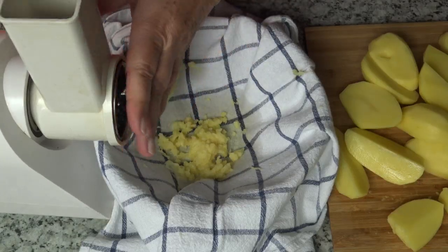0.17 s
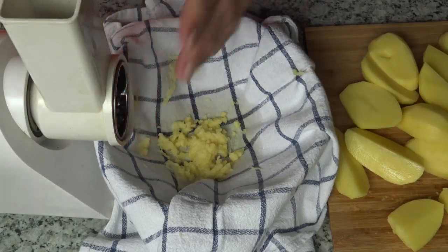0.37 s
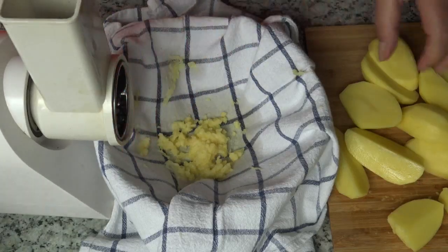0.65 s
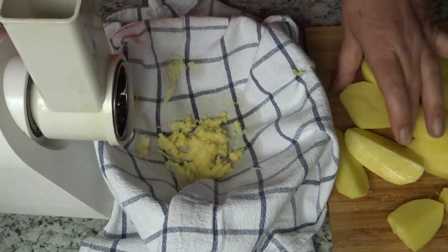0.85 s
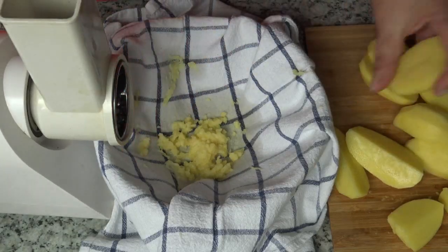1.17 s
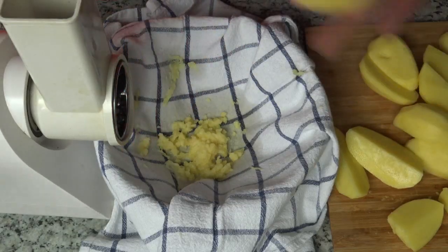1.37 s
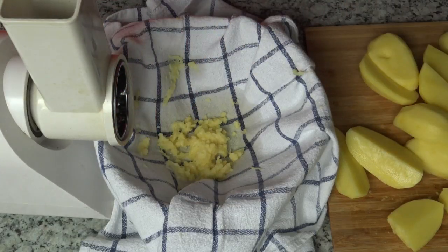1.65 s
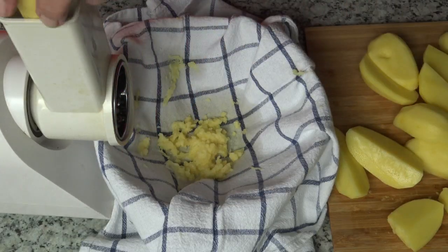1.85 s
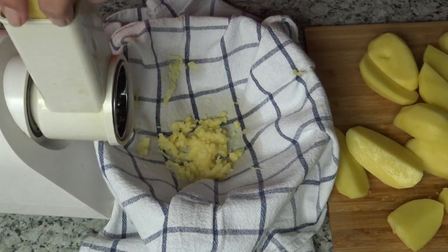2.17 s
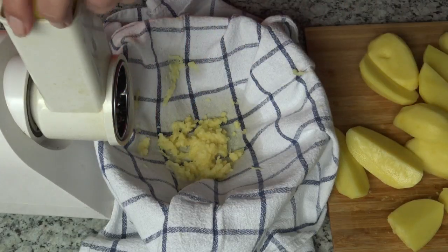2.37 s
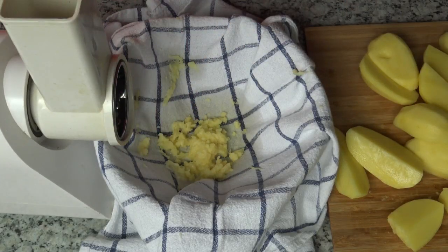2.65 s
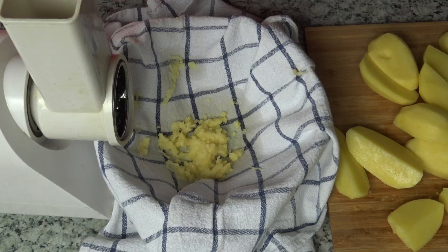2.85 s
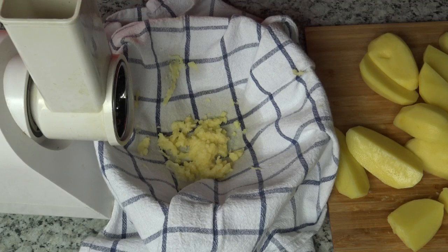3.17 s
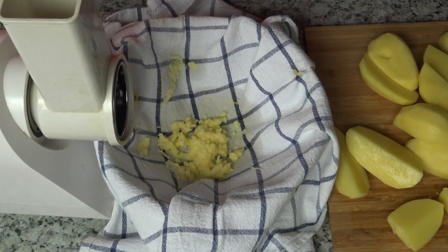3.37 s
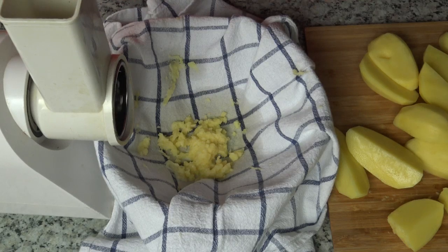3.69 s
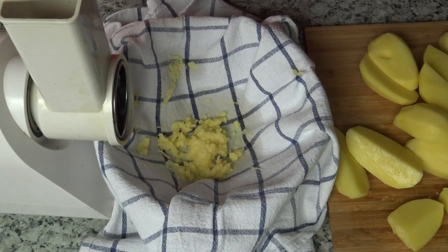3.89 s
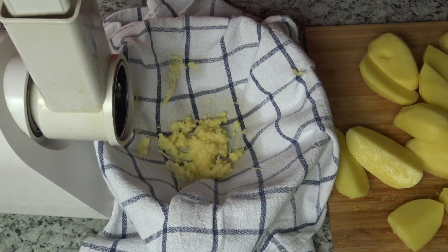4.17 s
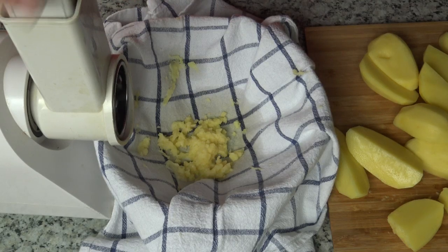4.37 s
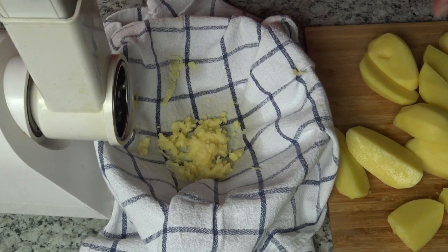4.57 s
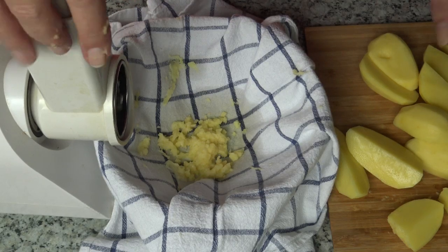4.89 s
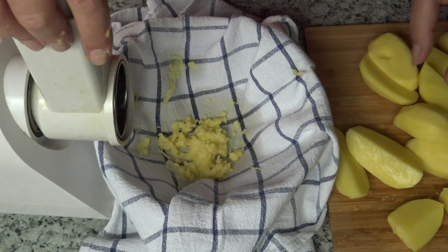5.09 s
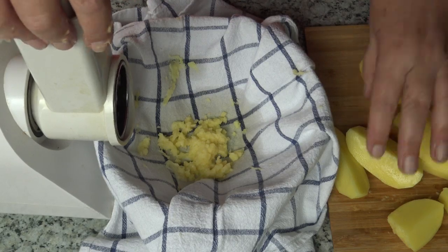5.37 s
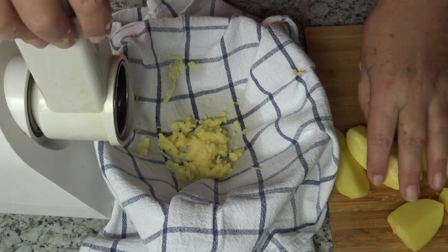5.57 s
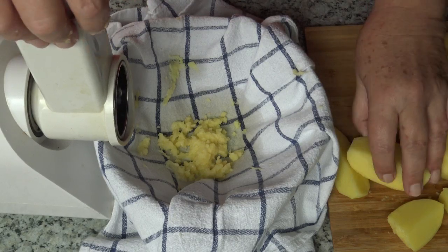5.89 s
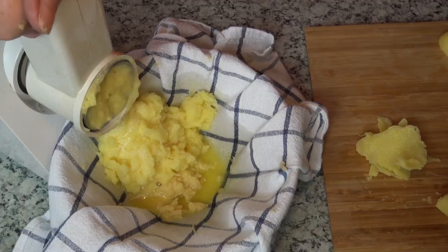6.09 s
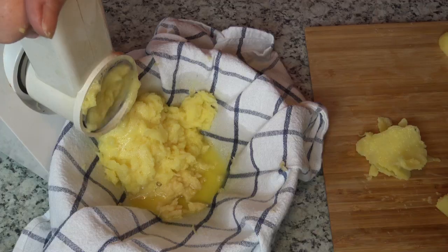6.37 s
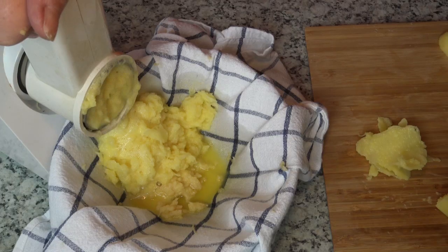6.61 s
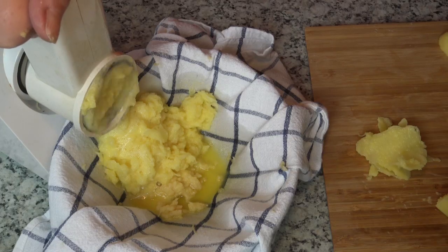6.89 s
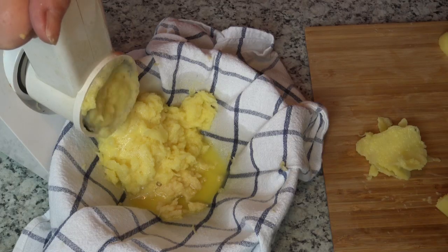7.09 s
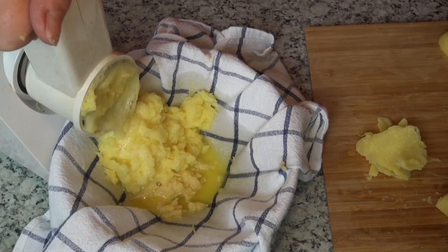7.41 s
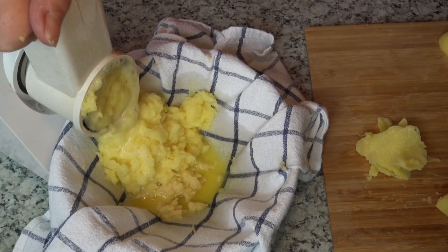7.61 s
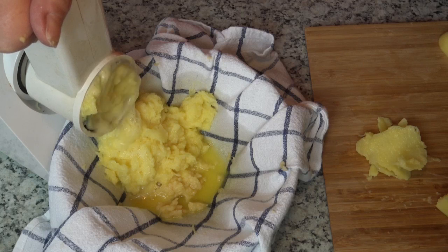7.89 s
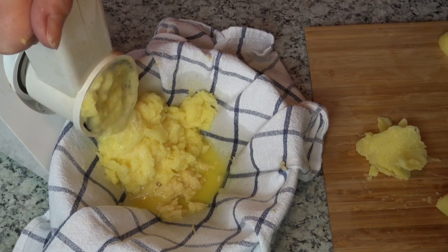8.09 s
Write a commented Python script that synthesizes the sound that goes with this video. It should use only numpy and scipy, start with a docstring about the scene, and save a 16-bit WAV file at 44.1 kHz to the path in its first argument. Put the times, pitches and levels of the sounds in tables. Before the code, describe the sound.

Potato pieces thump and squeak into a plastic-chuted grater; its motor clicks on, races up to a rattling whine, then shreds under load.

```python
"""On a kitchen counter, an electric drum grater stands close to the microphone.
The plastic pusher is drawn out and put down; potato rubs and squeaks down the chute and lands on the steel drum.
The switch snaps, and the geared motor runs up with hum, whining shaft orders, gear rattle and brush hiss.
After a short fade it is heard grating a full load, with the drum ringing in a narrow noise band.
Contacts are decaying modes with a thud and a click; a quiet room and a short reverberation lie behind."""
import sys
import numpy as np
from scipy import signal
from scipy.fft import rfft, irfft, next_fast_len
from scipy.io import wavfile
from scipy.ndimage import map_coordinates

SR = 44100
rng = np.random.default_rng(int(sys.argv[2]) if len(sys.argv) > 2 else 0)


def store_wav(level_fs):
    """Save 16-bit WAV to argv[1]."""
    pcm = np.round(np.clip(np.atleast_2d(level_fs), -1, 1) * 32767)
    wavfile.write(sys.argv[1], SR, pcm.T.astype(np.int16))


N = 363825


def amp(db):
    """Decibels to linear gain."""
    return 10 ** (np.asarray(db) / 20)


def unit(x):
    """x scaled to rms 1."""
    return x / np.sqrt(np.mean(x ** 2) + 1e-20)


def along(points, hz):
    """Interpolate (Hz, value) points on a log frequency axis."""
    f, v = np.transpose(points)
    return np.interp(np.log(hz + 1), np.log(f + 1), v)


def curves(rows):
    """One value per sample for each column after the time."""
    s, *cols = np.transpose(rows)
    return [np.interp(np.arange(N) / SR, s, c) for c in cols]


def wobble(rate):
    """A smooth random curve with rate knots a second."""
    knots = rng.standard_normal(int(N * rate / SR) + 4)
    coarse = np.arange(0, N, 32)
    smooth = map_coordinates(knots, [coarse * rate / SR])
    return np.interp(np.arange(N), coarse, smooth)


def filtered(x, response):
    """x filtered by a response given as a function of frequency."""
    size = x.shape[-1]
    m = next_fast_len(size + 8192)
    gain = response(np.fft.rfftfreq(m, 1 / SR))
    return irfft(rfft(x, m) * gain, m)[..., :size]


def coloured(x, spectrum):
    """x shaped by a spectrum, at rms 1."""
    return unit(filtered(x, lambda hz: amp(along(spectrum, hz))))


def noise(spectrum, size=N):
    """Random noise shaped by a spectrum, at rms 1."""
    return coloured(rng.standard_normal(size), spectrum)


def quiet_room():
    """The steady, mostly low noise of the room."""
    # room noise spectrum: pitch_hz [Hz], relative level_db [dB per Hz]
    room_spectrum = [(15, -40), (25, -1), (110, 4.5), (268, -10), (585, -11), (652, -15), (976, -12.5),
                     (1120, -14), (1240, -17), (2130, -17), (3280, -23), (10500, -27), (14100, -33),
                     (15700, -51)]
    return amp(-51.5) * noise(room_spectrum)


def kitchen(x):
    """Tiles and cupboards answer with a diffuse tail; each band dies at its own rate."""
    # reverberation time: pitch_hz [Hz], t60_s [s]
    decay_times = [(100, 0.69), (300, 0.28), (700, 0.28), (2500, 0.4), (12000, 0.23)]
    hz, t, z = signal.stft(rng.standard_normal(SR // 2), SR, nperseg=256)
    decay = amp(-60 * t / along(decay_times, hz)[:, None])
    tail = signal.istft(z * decay, SR, nperseg=256)[1]
    late = np.pad(tail, (SR // 200, 0))  # starts 5 ms after the direct sound
    return signal.fftconvolve(x, late / np.linalg.norm(tail))[:N]


def spread(x):
    """A reflection from the counter reaches the two microphones unalike: a delayed side signal."""
    # stereo width: pitch_hz [Hz], side_minus_mid_db [dB]
    side_levels = [(100, -19.5), (1500, -19.5), (3000, -18), (6000, -14.5), (9000, -10.5), (12000, -28)]
    delay_s = 0.000404
    side = filtered(x, lambda hz: amp(along(side_levels, hz)) * np.exp(-2j * np.pi * hz * delay_s))
    return np.array([x + side, x - side])


def lean(hz):
    """Left and right gains that set the machine off centre, differently in each band."""
    # stereo balance of the machine: pitch_hz [Hz], left_minus_right_db [dB]
    balance = [(60, -1), (100, -2), (150, 0), (250, 3.5), (292, 7), (309, 3.5), (328, 6.5), (500, 1.5),
               (1000, 2), (2500, -0.2), (5000, .8), (13000, 0.3)]
    return 2 / (1 + amp(np.outer([-1, 1], along(balance, hz))))


def contacts(rows, modes, thud, ring_db, thud_db, thud_t60, click_db, click_t60):
    """Each contact rings the part's modes, with a dull thud and a short bright click."""
    # click spectrum: pitch_hz [Hz], relative level_db [dB per Hz]
    click_spectrum = [(2000, -25), (4000, -3.5), (7000, -1), (10000, 0), (15000, -8.5)]
    out, t = np.zeros(N + SR), np.arange(SR // 2) / SR
    fade = lambda t60: np.exp(-np.log(1000) * t / t60)
    attack = 1 - np.exp(-t / 0.0011)
    for s, db, bright_db in rows:
        ring = 0
        for hz, level, t60 in modes:
            # only hard contacts reach the high modes
            mode_db = level + bright_db * (hz > 3000) + rng.normal(0, 1)
            pitch_hz = hz * rng.normal(1, 0.014)
            ring = ring + amp(mode_db) * fade(t60) * np.sin(2 * np.pi * pitch_hz * t)
        dull = amp(thud_db) * noise(thud, size=len(t)) * fade(thud_t60)
        body = (amp(ring_db) * ring + dull) * attack
        click_fade = fade(click_t60) + 0.34 * fade(0.016)
        click = amp(click_db + bright_db) * noise(click_spectrum, size=len(t)) * click_fade
        out[max(round(s * SR), 0):][:len(t)] += amp(db) * (body + click)
    return out[:N]


def slips(strokes, count, scatter_db):
    """A stroke sticks and slips count times along its length; each slip is one contact."""
    hits = []
    for s, length, db, bright_db in strokes:
        for u in np.linspace(0, 1, count):
            hits.append((s + length * u, db + scatter_db * rng.normal(), bright_db))
    return hits


def pusher():
    """The plastic pusher is drawn out and put down; its hollow modes ring."""
    # pusher contacts: start_s [s], relative level_db [dB], click_db relative to the body [dB]
    pusher_hits = [(0.061, -8.5, -11.5), (0.098, -20, -21.5), (0.752, -9.5, -34), (0.759, 3.5, -45),
                   (0.776, -4, -47.5), (0.8965, -4.5, -39)]
    # plastic modes: pitch_hz [Hz], relative level_db [dB], t60_s [s]
    plastic_modes = [(125, -22.5, 0.3), (566, -12, .11), (679.3, 1.5, 0.14), (757, -21, .1),
                     (940, -8, 0.11), (1266, -3.5, 0.065), (1395, -14, 0.058), (1552, -5.5, 0.065)]
    # dull noise of the plastic: pitch_hz [Hz], relative level_db [dB per Hz]
    plastic_thud = [(35, -67), (60, -48), (125, -12), (519, -13), (630, -41), (680, -1), (793, -4.5),
                    (1080, -16.5), (1500, -9.5), (1710, -22.5), (6000, -50.5), (7800, -93), (13200, -120)]
    return contacts(pusher_hits, plastic_modes, plastic_thud, ring_db=-10.5,
                    thud_db=-10.5, thud_t60=0.092, click_db=-7.5, click_t60=0.075)


def wet_handling():
    """Wet pieces are picked up and set down, and wet fingers wipe over plastic and potato."""
    # wet pats: start_s [s], relative level_db [dB], click_db relative to the body [dB]
    pat_hits = [(0.079, -26.5, -7), (1.137, -19, -17), (1.574, -31, -13), (1.668, -45, -8),
                (1.71, -25.5, -10.5)]
    # finger wipes: start_s [s], length_s [s], relative level_db [dB], click_db [dB]
    wipe_strokes = [(0.029, 0.02, -21, -11), (0.29, 0.04, -37, -12.5), (0.583, 0.012, -38, -5.5)]
    # counter modes: pitch_hz [Hz], relative level_db [dB], t60_s [s]
    counter_modes = [(130, -11, .2), (664, -1, 0.12), (1450, -29, .06)]
    # dull noise of a pat: pitch_hz [Hz], relative level_db [dB per Hz]
    wet_thud = [(59, -33.5), (100, -2), (238, -21), (315, -13), (839, -15.5), (1270, -4.5), (2280, -12.5),
                (5210, -13), (9000, -22), (11700, -52), (19800, -120)]
    hits = list(pat_hits) + slips(wipe_strokes, count=3, scatter_db=3.5)
    return contacts(hits, counter_modes, wet_thud, ring_db=-16.0,
                    thud_db=-9.0, thud_t60=0.13, click_db=-6.5, click_t60=0.17)


def potato_drops():
    """Potato lands on the steel drum and rings it."""
    # landings: start_s [s], relative level_db [dB], click_db relative to the body [dB]
    landings = [(0.002, -13.5, -11.5), (0.104, -14.5, -32.5), (1.948, -19, -20.5), (1.989, -30, -21),
                (2.046, -33, -28), (2.4985, -12, 1), (2.504, 0.5, -26), (2.547, -15, -9),
                (2.576, -17.5, -12.5), (2.691, -25.5, -17)]
    # drum modes: pitch_hz [Hz], relative level_db [dB], t60_s [s]
    drum_modes = [(132.8, -11, 0.22), (284.6, 5.5, 0.097), (327, -6, 0.13), (475, -11, 0.13),
                  (3490, -5, 0.15), (6130, -26, .25), (9230, -16, 0.24)]
    # dull noise of a landing: pitch_hz [Hz], relative level_db [dB per Hz]
    drum_thud = [(29, -55.5), (50, -26), (128, -2), (173, -6), (230, 6), (335, 2), (380, -29), (471, -10),
                 (564, -11.5), (3490, -27), (6000, -76.5), (7800, -71), (13200, -120)]
    return contacts(landings, drum_modes, drum_thud, ring_db=-9.5,
                    thud_db=-8, thud_t60=0.099, click_db=-14, click_t60=0.14)


def chute_rubs():
    """Potato knocks against the chute and rubs down it in small slips."""
    # knocks: start_s [s], relative level_db [dB], click_db relative to the body [dB]
    knock_hits = [(2.047, -32, -24), (2.548, -14, -16), (2.561, -27, -14), (2.576, -19, -13),
                  (4.413, -6, -22), (4.435, -12.5, -19), (4.488, -6, -21), (4.509, -11, -8)]
    # rubs: start_s [s], length_s [s], relative level_db [dB], click_db [dB]
    rub_strokes = [(1.843, 0.026, -31, -5), (1.934, 0.013, -31, -8), (2.096, 0.033, -32.5, -24),
                   (2.128, 0.03, -33, -28), (2.224, 0.014, -32.5, -12), (2.367, 0.026, -28.5, -13),
                   (2.451, 0.024, -26.5, -18)]
    # chute modes: pitch_hz [Hz], relative level_db [dB], t60_s [s]
    chute_modes = [(1357, 4.9, 0.038), (1690, 0.5, 0.0064), (1682, 2, 0.03)]
    # dull noise of the chute: pitch_hz [Hz], relative level_db [dB per Hz]
    chute_thud = [(88, -43), (150, -9), (270, -6.5), (681, -23), (858, -11), (1050, -14), (1500, -12.5),
                  (1940, -22.5), (6000, -31), (7800, -60), (13200, -120)]
    hits = list(knock_hits) + slips(rub_strokes, count=3, scatter_db=2)
    return contacts(hits, chute_modes, chute_thud, ring_db=-11.5,
                    thud_db=-8.5, thud_t60=0.075, click_db=-14.5, click_t60=0.07)


def squeaks(rough):
    """Wet potato sticks and slips on the chute wall: short, rough, gliding tones."""
    # squeaks: start_s [s], level_db [dB], length_s [s], start_hz [Hz], end_hz [Hz]
    squeak_glides = [(0.532, -40, 0.0091, 2050, 1924), (0.72, -42, 0.012, 2170, 2100),
                     (1.838, -32, 0.011, 1630, 1530), (2.45, -27, 0.01, 1510, 1600),
                     (2.46, -23.5, 0.016, 1520, 1490), (4.124, -21, 0.05, 1020, 616),
                     (4.155, -20.5, 0.054, 608, 421)]
    out = np.zeros(N)
    for s, db, length, start_hz, end_hz in squeak_glides:
        u = np.linspace(0, 1, round(length * SR))
        glide = start_hz + (end_hz - start_hz) * u
        hz = glide * (1 + rough * wobble(735)[:len(u)])
        tone = np.sin(2 * np.pi * np.cumsum(hz) / SR)
        out[round(s * SR):][:len(u)] += amp(db) * np.sin(np.pi * u) * tone
    return out


def switch():
    """The switch snaps over in a few close clicks."""
    # snaps: start_s [s], relative level_db [dB], click_db relative to the body [dB]
    snaps = [(3.207, -13.5, -13), (3.214, 1, -7.5), (3.222, -6.5, -13)]
    # switch modes: pitch_hz [Hz], relative level_db [dB], t60_s [s]
    snap_modes = [(785, 0, 0.13), (2340, -2.4, .04), (3070, -1, 0.034)]
    # noise of a snap: pitch_hz [Hz], relative level_db [dB per Hz]
    snap_thud = [(47, -44), (80, -22), (283, -8), (455, -8), (824, -2), (1300, -9), (2700, -2), (7990, -12),
                 (9000, -23), (11700, -55), (19800, -120)]
    return contacts(snaps, snap_modes, snap_thud, ring_db=-28,
                    thud_db=-9, thud_t60=0.058, click_db=-11, click_t60=0.052)


def coils():
    """The iron is pulled twice per mains cycle, hardest in the inrush of current."""
    settled_db, inrush_db = -48.5, 18.5  # inrush is the excess at switch-on
    switch_on_s, inrush_s = 3.3, 0.26  # the excess in dB dies with this time constant
    t = np.arange(N) / SR
    level = settled_db + inrush_db * np.exp(-np.maximum(t - switch_on_s, 0) / inrush_s)
    return amp(level + 2.1 * wobble(13)) * np.sqrt(2) * np.sin(2 * np.pi * 100 * t)


def housing(hz, modes):
    """Gain in dB that the housing's modes give a line as it glides through them."""
    grid = np.arange(0, 6000, 4)
    gain_db = sum(db * np.exp(-((grid - centre) / width) ** 2) for centre, width, db in modes)
    return np.interp(hz, grid, gain_db)


def motor(speed, singing, whine, gears, count, whine_db, sing_db, rattle_db, hiss_db,
          whistle_db, throb, spiky_db):
    """An unbalanced rotor hums, its orders whine, and the gears rattle in step with the shaft."""
    # how hard the drive works: time_s [s], rattle_db [dB], hiss_db [dB], before the trims passed in
    effort = [(3.28, -27, -34), (3.54, -22, -28), (3.75, -27, -35), (4.5, -27, -36), (4.75, -25.5, -32.5),
              (5.45, -23, -29), (5.97, -24, -30.3), (6.1, -24.5, -31.5), (7.1, -26, -32.5),
              (8.25, -25.5, -33)]
    # strong shaft orders that sing in the housing: order [multiples of shaft speed]
    singing_orders = [8, 9, 10, 13, 16]
    # housing modes, one list per singing order: pitch_hz [Hz], half_width_hz [Hz], gain_db [dB]
    housing_modes = [
        [(1630, 370, 10), (2345, 84, -13), (2474, 26, 11), (2582, 25, 12)],
        [(2785, 50, 9.5)],
        [(2680, 114, 13.5)],
        [(3768, 67, 11.5), (4020, 40, 3.5), (4306, 40, 7)],
        [(4180, 490, 15)],
    ]
    # rotor shaking the housing, most near its main resonance: shaft_hz [Hz], hum_db [dB]
    hum_levels = [(180, -38), (206, -24), (253, -11.5), (274, -10.5), (292, -12.5), (303, -11.5),
                  (309, -14), (325, -11.5), (334, -13.5)]
    # spectrum of the highest orders: pitch_hz [Hz], relative level_db [dB]
    whistle_spectrum = [(4500, -30), (5500, 7), (6500, 6.5), (8000, -5.5), (10000, 1), (11000, -10),
                        (13000, -8), (15500, -19)]
    # brushes and cooling air: pitch_hz [Hz], relative level_db [dB per Hz]
    brush_spectrum = [(3820, -15.5), (6500, -7.5), (7130, -2.5), (8570, -7), (9890, -7.5), (10800, -9),
                      (12700, -10.5), (15700, -21.5)]
    full_speed_hz, whine_db_per_octave = 313, 22.5  # the weaker whine grows with shaft speed
    flutter_db, flutter_per_s = 0.86, 24  # gears and brushes run unevenly
    # play in the gears at full speed, and the extra play at standstill
    backlash_rad, slow_backlash_rad = 0.0069, 0.12

    shaft_hz, = curves(speed)
    rattle, hiss = curves(effort)
    angle = 2 * np.pi * np.cumsum(shaft_hz * (1 + 0.00098 * wobble(20))) / SR
    # backlash shakes the shaft angle, which blurs the high orders most
    slack = backlash_rad + slow_backlash_rad * np.maximum(1 - shaft_hz / full_speed_hz, 0)
    shaken = angle + slack * wobble(300)
    turning = lambda k: np.sin(k * shaken + rng.uniform(0, 2 * np.pi))
    order = lambda k: np.sqrt(2) * amp(2.12 * wobble(22)) * turning(k)
    growth_db = whine_db_per_octave * np.log2(shaft_hz / full_speed_hz)

    weak_lines = sum(amp(db) * order(k) for k, db in whine)
    lines = amp(rattle + whine_db + growth_db) * weak_lines
    for k, db, modes in zip(singing_orders, singing, housing_modes):
        line_db = sing_db + db + housing(k * shaft_hz, modes) + 0.91 * wobble(6)
        lines += amp(line_db) * order(k)
    second_gear = np.cos(angle / 6)  # turns once per six shaft turns

    # the highest orders come and go, each on its own
    overtones = sum(amp(4 * wobble(2.5)) * turning(k) for k in range(18, 46))
    whistle = amp(hiss + whistle_db + growth_db) * coloured(overtones, whistle_spectrum)
    hum_db = along(hum_levels, shaft_hz) + 0.47 * wobble(25) + 0.91 * wobble(7)
    rotor = amp(hum_db) * np.sqrt(2) * np.sin(angle)

    # tooth impacts bunch up count times a turn
    bite = 1 + 0.33 * np.cos(count * angle) + 0.088 * second_gear

    def impacts():
        """White noise, spiky and fluttering, pulsed by the bite of the teeth."""
        uneven_db = spiky_db * wobble(1200) + flutter_db * wobble(flutter_per_s)
        return bite * amp(uneven_db) * rng.standard_normal(N)

    clatter = amp(rattle + rattle_db) * coloured(impacts(), gears)
    brushes = amp(hiss + hiss_db) * coloured(impacts(), brush_spectrum)
    return rotor + (1 + throb * second_gear) * lines + whistle + clatter + brushes


def shredding(ring_hz, width_hz):
    """Potato dragged over the teeth keeps the drum ringing in a narrow band, at a steady level."""
    def resonance(f):
        """Two equal band-pass resonances in a row."""
        damping = 1j * f * width_hz
        return (damping / (ring_hz ** 2 - f * f + damping)) ** 2

    return amp(-25.5) * unit(filtered(rng.standard_normal(N), resonance))


def machine():
    """The run-up fades out and the loaded run fades in, with coil buzz under both."""
    # shaft speed running up, then under load: time_s [s], shaft_hz [Hz]
    run_up = [(3.21, 40), (3.3, 160.5), (3.335, 186.1), (3.43, 228.8), (3.49, 245.7), (3.64, 268),
              (3.79, 278), (4.05, 289.4), (4.42, 295), (4.7, 308), (4.83, 309.4), (5.44, 309.6),
              (5.62, 307), (6.0, 310)]
    loaded = [(6.0, 334.7), (6.42, 330.1), (6.75, 330.5), (6.92, 327.8), (7.33, 329.3), (7.5, 325.7),
              (7.85, 326.1), (7.98, 322), (8.25, 322.2)]
    # singing order levels running up, then under load: relative level_db [dB]
    sing_up = [-35, -36, -35.5, -36.5, -38.5]
    sing_loaded = [-34, -32.5, -34, -41.5, -40]
    # weaker whine running up, then under load: order [multiples of shaft speed], relative level_db [dB]
    whine_up = [(.76, -2.5), (2, -5), (3, -4), (5, -5.5), (6, -6), (7, -2.5), (7.8, -9), (8.8, -8.5),
                (11, -5.5), (12, -4), (15, -1.5), (19, -9), (19.8, -16), (20, -14), (22.3, -5.5), (24, -11)]
    whine_loaded = [(.76, -3), (2, -5.5), (2.3, -1.5), (8.8, -7.5), (11, -4.5), (12, -5.5), (14, -9),
                    (15, -11.5), (17, -10.5), (20, -4.5)]
    # gear noise running up, then under load: pitch_hz [Hz], relative level_db [dB per Hz]
    gears_up = [(40, -38), (100, -5), (160, -7), (220, 5), (300, 14.5), (400, -3), (560, -2.5), (720, 4.5),
                (1150, 0.5), (1550, 3), (2000, -4), (2700, 2), (3500, -2.5), (4100, 1), (5300, -7.5),
                (6100, 0), (8000, -18), (11000, -27)]
    gears_loaded = [(40, -49), (120, -1), (220, 8.5), (280, 6.5), (380, -3), (560, 4), (950, 5),
                    (1200, 0.5), (1550, 5), (2050, -2.5), (2700, 5.5), (3300, -0.5), (4400, -1), (5400, -6),
                    (6600, -4), (8000, -13.5), (11000, -47)]
    starting = motor(run_up, sing_up, whine_up, gears_up, count=2, whine_db=-7, sing_db=-1.0,
                     rattle_db=4.5, hiss_db=2.0, whistle_db=-5, throb=0.28, spiky_db=0.5)
    grating = motor(loaded, sing_loaded, whine_loaded, gears_loaded, count=3, whine_db=-6.5, sing_db=-0.5,
                    rattle_db=4.0, hiss_db=0.0, whistle_db=-2.5, throb=0.12, spiky_db=1.0)
    grating += shredding(ring_hz=728.4, width_hz=46)
    first, = curves([(3.213, 0), (3.225, 1), (5.972, 1), (6.006, 0)])
    second, = curves([(6.002, 0), (6.04, 1)])
    return first * starting + second * grating + (first + second) * coils()


def scene():
    """Room and reverberation, handling a little to the left, and the machine with what sounds inside it."""
    beside = pusher() + wet_handling()
    inside = potato_drops() + chute_rubs() + switch() + squeaks(rough=0.096)
    room = quiet_room() + amp(-9.5) * kitchen(beside + inside)
    handling = amp([[.8], [-.8]]) * spread(beside)  # left and right gain in dB
    grater = filtered(spread(machine() + inside), lean)
    return spread(room) + handling + grater


def record(dry):
    """Nothing passes above the upper band limit."""
    top_hz = 15820
    return filtered(dry, lambda hz: hz < top_hz)


dry = scene()
out = record(dry)
store_wav(out)
```